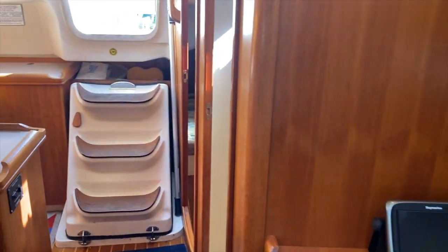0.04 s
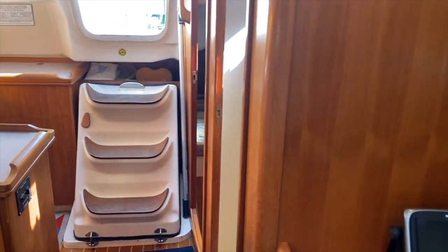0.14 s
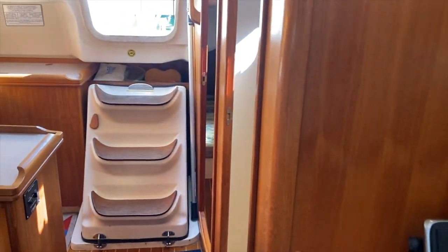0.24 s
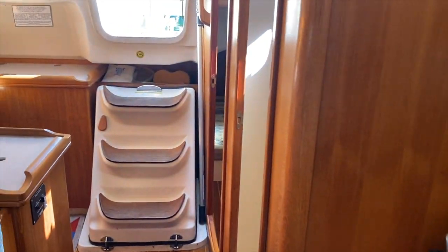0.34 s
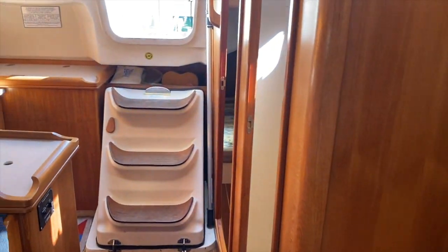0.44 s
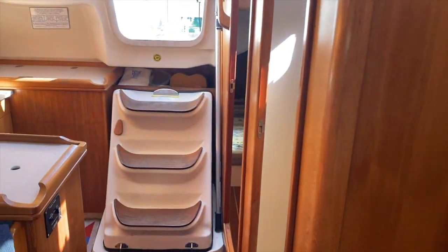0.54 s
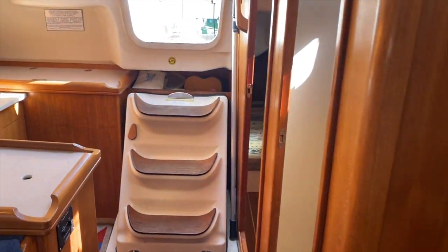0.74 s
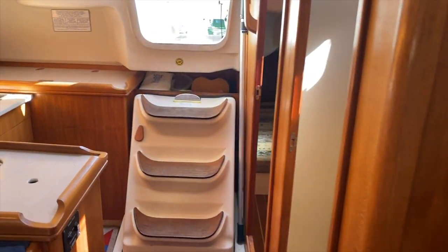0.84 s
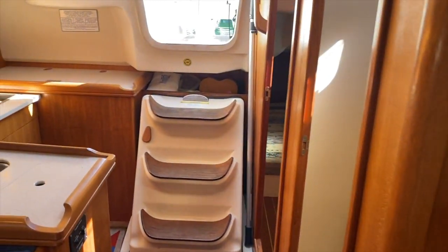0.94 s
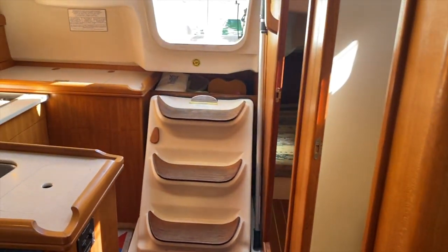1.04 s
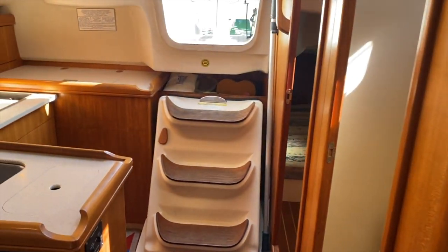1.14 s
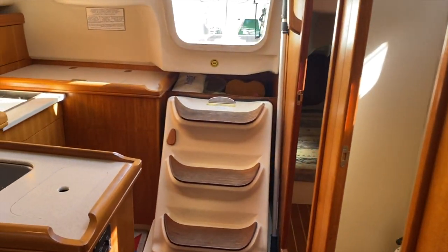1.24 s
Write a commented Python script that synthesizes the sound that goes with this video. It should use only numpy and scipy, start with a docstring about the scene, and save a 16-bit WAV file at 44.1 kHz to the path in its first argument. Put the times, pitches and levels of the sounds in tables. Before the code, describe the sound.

Soft, low thuds and rumble come from a shifting grip on a handheld microphone inside a small boat cabin. A quick run of light wooden clacks rings briefly nearby, growing stronger, before everything settles to a faint hiss.

```python
"""A low rumble, a faint hiss and a brief rub open the scene: someone is moving about a small
wooden boat cabin with a camera in hand. The shifting grip makes the rumble, and dull handling
bumps thud through the camera body. Light clacks from the woodwork follow one another, each
a sharp snap and a short ring between the close panels. Then the rumble dies away."""
import sys
import numpy as np
from scipy import signal
from scipy.fft import rfft, irfft, next_fast_len
from scipy.io import wavfile
from scipy.ndimage import map_coordinates

SR = 44100
rng = np.random.default_rng(int(sys.argv[2]) if len(sys.argv) > 2 else 0)


def unload_audio(sound):
    """Save the sound as a 16-bit wav file, at the path given as the first command line argument."""
    columns = np.transpose(np.atleast_2d(sound))
    # keep every value between -1 and 1, then stretch to whole-number steps
    steps = np.round(np.clip(columns, -1, 1) * 32767)
    wavfile.write(sys.argv[1], SR, steps.astype(np.int16))


N = 57330

# Tone of the camera body's rumble: f/Hz, level/dB
RUMBLE_TONE = [(20, -25), (40, 2.5), (68, 6), (130, 0.5), (220, -9.5), (400, -30), (900, -50), (3000, -90)]
# How alike left and right are in that rumble (1 = the same): f/Hz, likeness
RUMBLE_LIKENESS = [(50, 0.79), (300, 0.94)]
# How alike left and right are in the cabin air: f/Hz, likeness
CABIN_LIKENESS = [(100, 0.74), (300, 0.73), (700, 0.42), (3000, 0.2), (6000, 0.13), (10000, 0.094)]


def gain(db):
    """Turn decibels into a number to multiply by."""
    return 10 ** (np.asarray(db) / 20)


def normalise(x):
    """Scale a signal to an average power of 1."""
    return x / np.sqrt(np.mean(x ** 2) + 1e-20)


def look_up(points, hz):
    """Read between (f/Hz, value) points, with octaves evenly spaced."""
    freqs, values = np.transpose(points)
    return np.interp(np.log(hz + 1), np.log(freqs + 1), values)


def fade(points):
    """Join (t/s, level/dB) points into one gain per sample."""
    return gain(np.interp(np.arange(N) / SR, *np.transpose(points)))


def since(start):
    """Seconds since a moment, zero before it."""
    return np.maximum(np.arange(N) / SR - start, 0)


def filtered(x, response):
    """Multiply each frequency in x by response(hz)."""
    size = next_fast_len(N + SR // 2)
    hz = np.fft.rfftfreq(size, 1 / SR)
    return irfft(rfft(x, size) * response(hz), size)[..., :N]


def noise(tone_db, likeness):
    """Stereo noise shaped by tone_db(hz): a shared middle, plus or minus a side part."""
    def response(hz):
        angle = np.arccos(np.clip(look_up(likeness, hz), -1, 1)) / 2
        return gain(tone_db(hz)) * [np.cos(angle), np.sin(angle)]
    mid, side = filtered(rng.standard_normal((2, N)), response)
    return np.array([mid + side, mid - side])


def steady_noise(tone, likeness):
    """Stereo noise of power 1, shaped by (f/Hz, level/dB) points."""
    return normalise(noise(lambda hz: look_up(tone, hz), likeness))


def grip_rumble():
    """The shifting grip makes the camera body rumble while the person moves."""
    # Rise and fall of the rumble: t/s, level/dB
    levels = [(0, -51), (.1, -55), (.2, -53.5), (.38, -37), (.52, -46.5), (.64, -38), (.8, -44),
              (.93, -46.5), (1.04, -58.5), (1.3, -65.5)]
    return fade(levels) * steady_noise(RUMBLE_TONE, RUMBLE_LIKENESS)


def cabin_hiss():
    """Faint cabin air, with a higher fizz that swells during the movement."""
    # Rise and fall of the air and the fizz: t/s, level/dB
    air_levels = [(0, -61.5), (.15, -62.5), (.25, -61.5), (.34, -60), (.6, -57), (.74, -61.5), (1.02, -57),
                  (1.18, -60), (1.3, -62)]
    fizz_levels = [(0, -86.5), (.26, -80.5), (.34, -68.5), (.5, -71.5), (.73, -70.5), (.9, -70.5),
                   (1.03, -67), (1.2, -72.5), (1.3, -78)]
    # Tone of each: f/Hz, level/dB
    air_tone = [(30, 2.5), (130, 0.5), (400, 2), (600, -4.5), (1000, -4.5), (2000, -12.5), (4000, -19.5),
                (7000, -26), (10500, -34.5), (15000, -54)]
    fizz_tone = [(1000, -8.5), (3500, 4.5), (6500, 1), (10500, -2.5), (14000, -10), (16000, -15)]
    air = fade(air_levels) * steady_noise(air_tone, CABIN_LIKENESS)
    fizz = fade(fizz_levels) * steady_noise(fizz_tone, CABIN_LIKENESS)
    return air + fizz


def rub():
    """A brief, faint rub: noise gathered closely around one pitch."""
    # The rub: t/s, length/s, f/Hz, width/Hz, level/dB
    stroke = (0, .11, 1640, 150, -71)
    start, length, pitch_hz, width_hz, db = stroke
    progress = np.minimum(since(start) / length, 1)
    swell = np.sqrt(np.abs(np.sin(np.pi * progress)))
    tone_db = lambda hz: -20 * np.log10(1 + ((hz - pitch_hz) / width_hz) ** 2)
    return gain(db) * swell * normalise(noise(tone_db, CABIN_LIKENESS))


def handling_bumps():
    """Each soft knock swings the camera body a few times, a little differently left and right."""
    # Knocks on the body: t/s, level/dB before the boost, f/Hz, time to fade by 60 dB/s
    knocks = [(0.023, -52.5, 75, .08), (0.148, -37.5, 97, 0.051), (.211, -28.5, 76, 0.083),
              (0.24, -29, 51, 0.089), (0.275, -47, 120, 0.073), (0.287, -22, 74, 0.047),
              (0.344, -35.5, 71, 0.074), (.383, -23.5, 70.2, 0.18), (0.441, -23.5, 67, 0.1),
              (.486, -34, 101.4, 0.097), (0.546, -33.5, 59.4, 0.25), (.557, -19, 218, 0.023),
              (.571, -31, 96, 0.055), (0.592, -31, 134, 0.12), (0.678, -32.5, 66, 0.073),
              (0.71, -24.5, 58.7, 0.074), (.754, -32.5, 237, 0.028), (.764, -19, 112, 0.036),
              (0.785, -27.5, 75.5, 0.083), (0.832, -43.5, 55.4, 0.36), (0.885, -40, 66.5, 0.18)]
    attack_s, boost_db, side_db, left_db = 0.0038, 5.5, -14.5, 0.45
    out = np.zeros((2, N))
    for start, db, hz, fade_s in knocks:
        t = since(start)
        envelope = gain(db + boost_db - 60 * t / fade_s) * (1 - np.exp(-t / attack_s))
        swing = np.sin(2 * np.pi * hz * t)
        shudder = normalise(steady_noise(RUMBLE_TONE, RUMBLE_LIKENESS)[0])
        side = gain(side_db) * shudder / np.sqrt(2)
        out += envelope * (swing + np.array([side, -side]))
    return out * gain([[left_db], [-left_db]])


def wood_clacks():
    """Each clack is a snap, a dense burst of echoes off the near panels and a faint tail."""
    # Clacks in the woodwork: t/s, level/dB in each of five bands, time to fade by 60 dB/s,
    # lean to the left/dB, low ring f/Hz, high ring f/Hz, ring boost/dB,
    # snap delay/s, snap level/dB, snap treble limit f/Hz
    hits = [(.096, -53, -56, -66.5, -68, -77, 0.11, -1.1, 890, 1680, 9.8, 0.0023, -57, 1200),
            (0.128, -57, -60, -65.5, -62, -76, 0.27, -0.5, 810, 2320, 1, 0.0024, -53.5, 5040),
            (0.286, -54, -56, -60, -62, -58.5, 0.1, -1.2, 1183, 2560, 14, 0.0019, -48.5, 12700),
            (0.469, -65, -50, -51, -51, -59.5, 0.15, -0.3, 680, 2230, 7.3, 0.00047, -51, 5000),
            (.537, -49.5, -48, -54.5, -50.5, -58, 0.16, -1, 1207, 3980, 8.9, 0.0057, -46.5, 9700),
            (.605, -43.5, -43.5, -45.5, -49.5, -51.5, 0.23, -0.41, 950, 2180, 1.9, 0.0039, -43, 11100),
            (0.777, -42.5, -48.5, -45.5, -49.5, -54.5, 0.17, -1.2, 1590, 2308, 6.1, 0.00066, -51.5, 4530),
            (0.831, -45.5, -48, -49.5, -53.5, -55.5, 0.21, -0.16, 1080, 2320, 4.3, 0.0013, -42.5, 10900),
            (.905, -46, -45, -48.5, -49, -56, 0.17, .5, 720, 4050, 6.4, 0.0038, -40, 4070),
            (0.955, -47, -50, -47, -53, -65.5, 0.17, 0, 1042, 1910, 10, 0.00048, -38.5, 3260)]
    # Centres of the five bands: f/Hz
    bands = [350, 750, 2000, 5000, 9500]
    # Tone added to every clack: f/Hz, level/dB
    wood_tone = [(60, -26), (200, -8.5), (330, -0.5), (440, 0.5), (540, -5), (800, 0.5), (2300, -2.5),
                 (3000, -2.5), (4200, -3), (7500, -3.5), (10500, -2), (15000, -36)]
    # Pitches at which the panels ring: f/Hz, width/Hz, boost/dB
    panels = [(400, 8.8, 5), (657, 27, 8.5), (713, 26, 1.5), (934, 29, 3), (1147, 68, 4.5), (1470, 20, 9.5),
              (1797, 31, 7), (2213, 244, 6)]
    trim_db, attack_s, hold_s = -2.5, 0.00088, 0.017
    tail_db, tail_fade_s = -22, 0.48  # the cabin's lingering answer
    ring_width = 0.054  # as a share of the ring's pitch
    uneven_db, uneven_step_hz = 2.2, 70
    out = np.zeros((2, N))
    for start, *band_db, fade_s, pan_db, low_hz, high_hz, ring_db, delay, snap_db, edge_hz in hits:
        # Spread each band's power over a width equal to its frequency.
        spread_db = np.array(band_db) + 10 * np.log10(SR / 2 / np.array(bands))
        band_tone = list(zip(bands, spread_db))
        peaks = list(panels) + [(hz, ring_width * hz, ring_db) for hz in (low_hz, high_hz)]
        chance = rng.standard_normal(size=300)  # each contact point rings the panels differently

        def tone_db(hz):
            rings = sum(db / (1 + (2 * (hz - centre) / width) ** 2) for centre, width, db in peaks)
            uneven = uneven_db * map_coordinates(chance, [hz / uneven_step_hz], mode="nearest")
            return look_up(band_tone, hz) + look_up(wood_tone, hz) + rings + uneven

        t = since(start)
        burst = gain(-60 * since(start + hold_s) / fade_s)
        tail = gain(tail_db - 60 * t / tail_fade_s)
        envelope = np.hypot(burst, tail) * (1 - np.exp(-t / attack_s))
        echoes = gain(trim_db) * envelope * noise(tone_db, CABIN_LIKENESS)
        clack = echoes + contact_snap(start + delay, snap_db, edge_hz)
        out += clack * gain([[pan_db / 2], [-pan_db / 2]])
    return out


def contact_snap(start, db, edge_hz):
    """The instant of contact: a short, gritty snap with its own level and treble limit."""
    decay_s, low_cut_hz, db_per_octave = 0.0034, 584, -3
    bass_loss_db = lambda hz: 10 * np.log10(1 + (low_cut_hz / (hz + 1)) ** 4)
    # How alike left and right are in a snap: f/Hz, likeness
    likeness = [(500, 0.77), (3000, 0.33), (12000, 0.039)]
    grit = noise(lambda hz: db_per_octave * np.log2(hz + 1) - bass_loss_db(hz), likeness)
    t = since(start)
    click = (t > 0) * np.exp(-t / decay_s) * grit
    treble_cut = signal.butter(3, edge_hz, fs=SR, output="sos")
    return gain(db) * signal.sosfilt(treble_cut, click) / np.std(signal.sosfilt(treble_cut, grit))


def scene():
    """All the cabin's sounds, added together at the camera."""
    return handling_bumps() + wood_clacks() + grip_rumble() + cabin_hiss() + rub()


def record(dry):
    """The camera loses the deepest bass, softens the top treble and keeps nothing above its limit."""
    low_cut_hz, soften_hz, limit_hz = 34, 14800, 15800
    bass_cut = lambda hz: hz ** 2 / np.hypot(hz ** 2, low_cut_hz ** 2)
    treble_cut = lambda hz: (hz < limit_hz) / np.hypot(1, (hz / soften_hz) ** 20)
    return filtered(dry, lambda hz: bass_cut(hz) * treble_cut(hz))


dry = scene()
out = record(dry)
unload_audio(out)
```